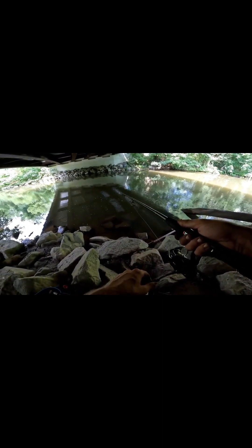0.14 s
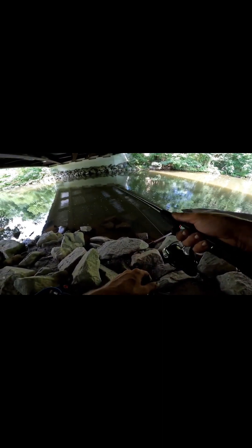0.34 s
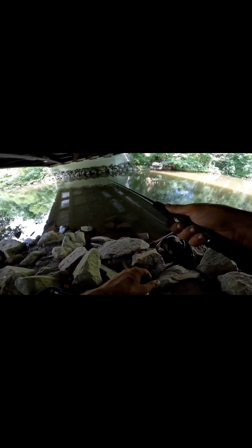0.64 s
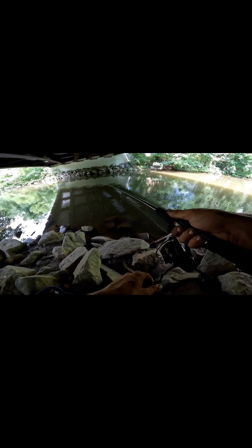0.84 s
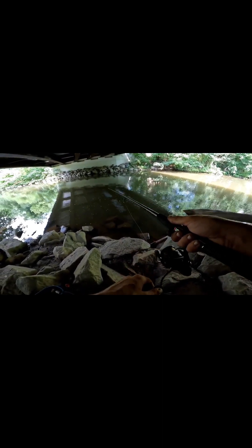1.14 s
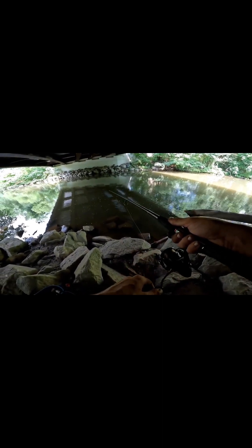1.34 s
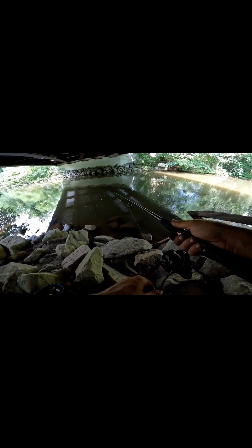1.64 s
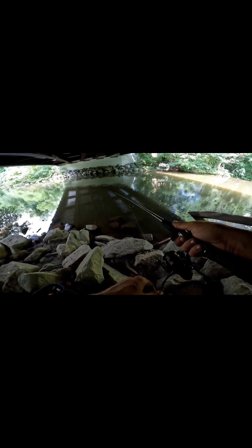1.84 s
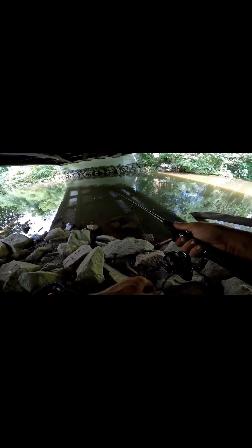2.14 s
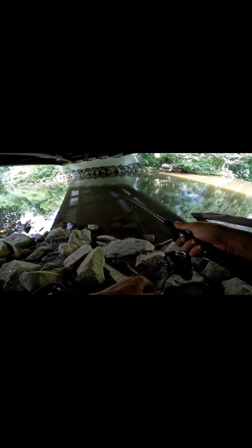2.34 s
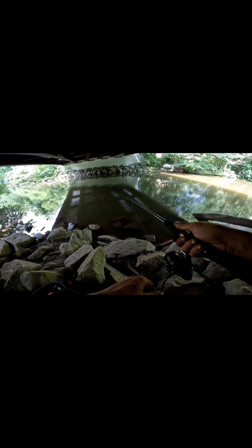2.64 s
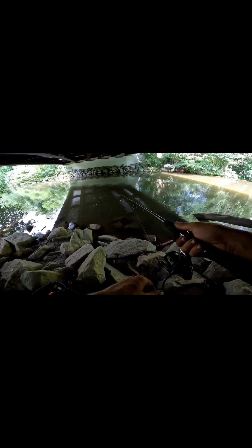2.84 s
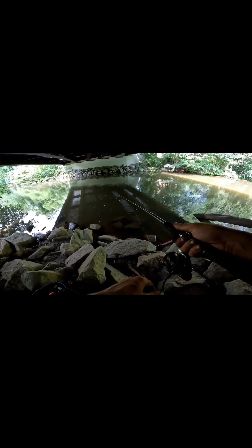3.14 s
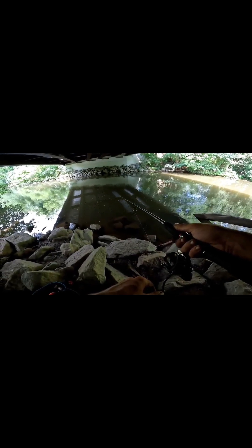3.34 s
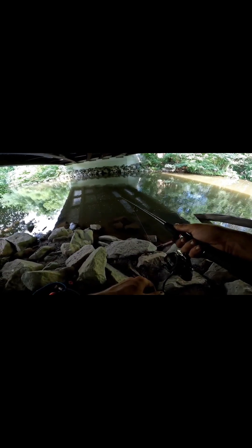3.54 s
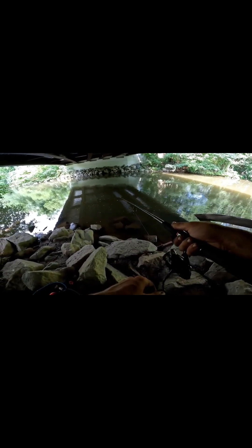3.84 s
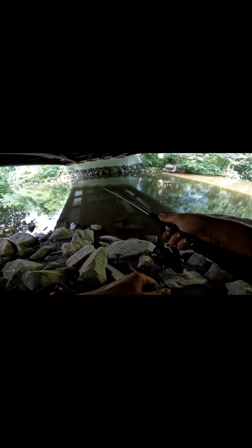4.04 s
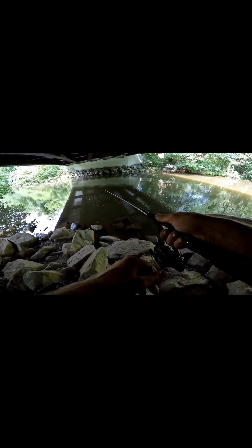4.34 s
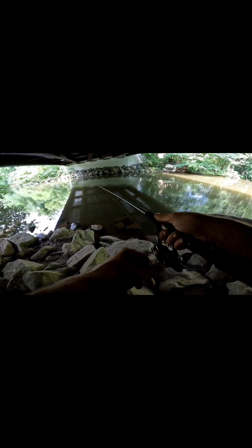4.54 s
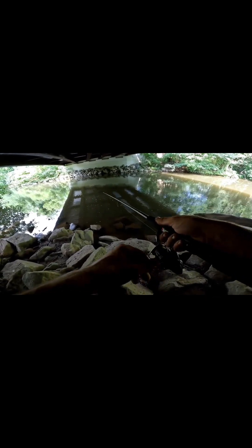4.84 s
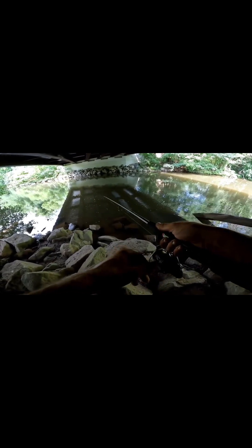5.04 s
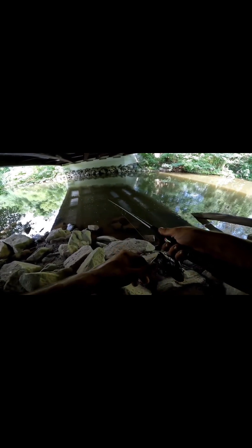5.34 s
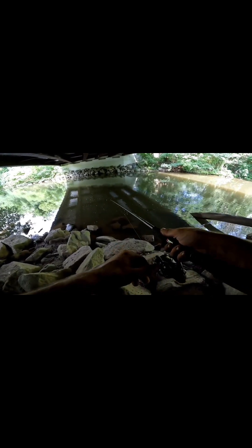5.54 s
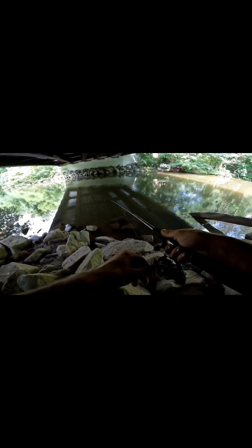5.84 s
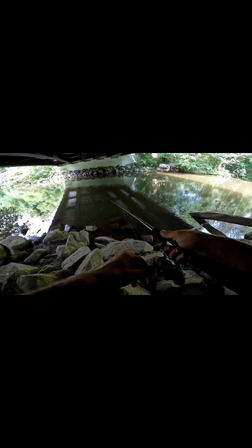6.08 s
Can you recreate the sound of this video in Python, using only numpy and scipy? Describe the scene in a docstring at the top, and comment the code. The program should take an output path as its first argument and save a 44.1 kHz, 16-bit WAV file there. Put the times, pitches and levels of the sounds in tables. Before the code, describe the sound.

Under a road bridge beside a creek, heard in stereo from the rocks. Throughout, a soft, bass-heavy outdoor wash, small hollow water gurgles, and fast, thin cricket trills around 7 kHz over a blurred distant chorus; a far insect rasps faintly about twice a second. A barely audible line rustle and tick open the scene. At 1.1-1.3 s muffled low thumps mark a vehicle rolling onto the deck; a deep rumble builds, with a tiny watery plip at 1.5 s. A hoarse rising bird chip echoes at 2.2 s. Tyre roar is brightest near 3.5 s, then falls off after 4.1 s. Tiny crisp gear ticks and a faint creak cluster at 3.9-4.0 s. A second chip follows at 4.3 s, a dull thump at 4.4 s. Deep shudder sinks away through 5-6 s, leaving crickets, a gurgle near 5.9 s, and a faint distant hoarse call around 6.1 s.

```python
"""A few near crickets trill, each a tone pulsed by its wing strokes, over grainy and blurred bands of farther ones.
Under a road bridge, a creek gurgles as many ringing bubbles, with a small splash and a steady noise wash.
A vehicle crosses overhead: low noise rumbles, joint thumps ring, and tyre noise swells and fades with distance.
A far insect rasps in noise swells, fishing gear ticks, creaks and rustles faintly, a bird gives two rising
chips with echoes and a scattered tail, and a last hoarse call swells as coloured noise."""
import sys
import numpy as np
from scipy import signal
from scipy.fft import rfft, irfft, next_fast_len
from scipy.io import wavfile
from scipy.ndimage import uniform_filter1d

SR = 44100
rng = np.random.default_rng(int(sys.argv[2]) if len(sys.argv) > 2 else 0)


def transcribe(signal):
    """Save signal, clipped to [-1, 1], as a 16-bit WAV file at the path in sys.argv[1]."""
    frames = np.atleast_2d(signal).T
    limited = np.clip(frames, -1, 1)
    pcm = np.round(limited * 32767).astype(np.int16)
    wavfile.write(sys.argv[1], SR, pcm)


N = 273851


def gain_of(db):
    """Level law: amplitude grows tenfold for every 20 dB."""
    return 10 ** (np.asarray(db) / 20)


def evened(x):
    """Normalisation: scales a signal to rms 1."""
    return x / np.sqrt(np.mean(x ** 2) + 1e-20)


def interpolated(points, hz):
    """Spectral interpolation: reads a curve on a log-frequency axis."""
    f, value = np.transpose(points)
    return np.interp(np.log(hz + 1), np.log(f + 1), value)


def level(rows):
    """Envelope: turns a dB curve over time into a gain for every sample."""
    return gain_of(np.interp(np.arange(N) / SR, *np.transpose(rows)))


def add(mix, start_s, sound):
    """Superposition: adds a sound to the mix at its start time."""
    part = mix[max(round(start_s * SR), 0):][:len(sound)]
    part += sound[:len(part)]


def drift(hz):
    """Random modulation: low-passed noise of rms 1, fading out above the given rate."""
    size = next_fast_len(N // 16)
    f = np.fft.rfftfreq(size, N / size / SR)
    slow = irfft(rfft(rng.standard_normal(size)) * np.exp(-(f / hz) ** 2), size)
    return evened(np.interp(np.linspace(0, size - 1, N), np.arange(size), slow))


def pan(x, side_db):
    """Intensity stereo: places a sound by its left-minus-right level."""
    return x * gain_of([[side_db / 2], [-side_db / 2]])


def steadied(x, span_s=0.48):
    """Gain control: divides noise by its smoothed strength, leaving its quick flutter."""
    power = uniform_filter1d(x.mean(0) ** 2, round(span_s * SR))
    return x / np.sqrt(uniform_filter1d(power, round(span_s * SR / 2)))


def swells(rows, length_s):
    """Amplitude envelope: a raised-cosine rise and fall centred on each row's time."""
    t = np.arange(N) / SR
    gain = 0
    for centre_s, db in rows:
        place = np.clip(2 * (t - centre_s) / length_s, -1, 1)
        gain = gain + gain_of(db) * np.cos(np.pi / 2 * place) ** 2
    return gain


def rings(rows, ring_s):
    """Damped resonance: each row (start s, level dB, Hz) gives one exponentially dying tone."""
    t, out = np.arange(SR // 2) / SR, np.zeros(N)
    for start_s, db, hz in rows:
        add(out, start_s, gain_of(db) * np.exp(-t / ring_s) * np.sin(2 * np.pi * hz * t))
    return out


# Likeness of the two microphones. Each row: frequency in Hz, left-right correlation.
COHERENCE = [(15, .995), (50, .9994), (150, .9996), (250, .994), (500, .94), (1030, .85), (2090, .66),
             (4250, .6), (7200, .78), (8700, .72), (12000, .4)]
# Spectral balance of the pair. Each row: frequency in Hz, left-minus-right level in dB.
BALANCE = [(300, 0), (550, 2.5), (950, 4), (1650, 3), (2860, 1), (5500, -1.5), (6500, 4), (7200, 3.5),
           (8000, 3), (8800, -1.5), (12000, 8.5)]
# Phase between the pair. Each row: frequency in Hz, lead of the left in radians.
PHASE_LEAD = [(500, -0.026), (1000, -0.48), (2580, -0.96), (3880, -0.11), (4910, -0.18), (7600, 0.48)]
# Resonances of the hollow under the deck. Each row: frequency in Hz, width in Hz, lift in dB.
HOLLOW = [(50.3, 9.6, -0.5), (106.2, 7.4, 2), (163.2, 8.5, 3), (224.2, 6.4, 3.5), (276, 13, 0.5),
          (309.4, 16, 2), (334.5, 16, 3.5), (443, 75, 2), (683, 11, 3), (918, 75, 3.5)]


def air(colour):
    """Diffuse field: partly coherent stereo noise of a given colour, lifted by the hollow's resonances."""
    size = next_fast_len(N)
    hz = np.fft.rfftfreq(size, 1 / SR)
    a, b, c, d = rng.standard_normal((4, len(hz)))
    apart = np.interp(hz, [150, 300], [0, 1])  # long waves reach both microphones at equal level and phase

    same = np.clip(interpolated(COHERENCE, hz), -1, 1)
    left = a + 1j * b
    right = same * left + np.sqrt(1 - same ** 2) * (c + 1j * d)
    right = right * np.exp(-1j * apart * interpolated(PHASE_LEAD, hz))
    tilt = gain_of(apart * interpolated(BALANCE, hz) / 2)

    boom_db = sum(db / (1 + (2 * (hz - f) / width) ** 2) for f, width, db in HOLLOW)
    closed = 1 / (1 + (hz / colour[-1][0]) ** 10)  # fades out above the last point
    gain = gain_of(interpolated(colour, hz) + boom_db) * closed
    pair = irfft(np.array([left * tilt, right / tilt]) * gain, size)[:, :N]
    return pair / pair.mean(0).std()


# Reverberation under the bridge. Each row: frequency in Hz, time to fall 60 dB in seconds.
DECAY = [(2000, 0.77), (5000, 0.97), (9000, 1)]


def bridge(x, same=0.46):
    """Reverberation: concrete and water scatter sound into a noise tail decaying at its own rate per band."""
    a, b = rng.standard_normal((2, SR))
    same = np.clip(same, 0, 1)
    right = same * a + np.sqrt(1 - same ** 2) * b
    hz, t, z = signal.stft([a, right], SR, nperseg=256)
    decay = np.exp(-np.log(1000) * t / interpolated(DECAY, hz)[:, None])
    tail = signal.istft(z * decay, SR)[1]
    return signal.fftconvolve(x[None], tail / np.linalg.norm(tail[0]), axes=1)[:, :N]


# Steady wash of creek and far roads. Each row: frequency in Hz, relative level in dB per Hz.
WASH_COLOUR = [(15, -1.5), (50, 2.5), (80, 0), (110, -4.5), (200, -12), (330, -19.5), (600, -20.5),
               (780, -21.5), (930, -21), (1100, -21.5), (1500, -24), (2400, -36), (4200, -49), (8500, -52),
               (13000, -94)]


def wash(level_db=-34.5):
    """Stationary noise: the outdoor wash is coloured noise held at an even strength."""
    return steadied(air(WASH_COLOUR)) * gain_of(level_db)


def bubbles(range_hz, count, per_s, ring_s, spread_db, rise_per_s=1.4, wet_db=-2):
    """Bubble resonance: bubbles of many pitches ring and glide upward at random (Poisson) moments."""
    t, out = np.arange(SR // 10) / SR, np.zeros(N)
    for hz in np.geomspace(*range_hz, count):
        envelope = (1 - np.exp(-10 * t / ring_s)) * np.exp(-t / ring_s)
        bubble = envelope * np.sin(2 * np.pi * hz * t * (1 + rise_per_s * t / 2))
        starts_s = np.cumsum(rng.exponential(count / per_s, 100))
        for start_s, size in zip(starts_s, rng.exponential(1, 100)):
            add(out, start_s, gain_of(spread_db * min(size, 3)) * bubble)
    return evened(out + gain_of(wet_db) * bridge(out))


# Louder gurgles of the creek. Each row: centre in seconds, level in dB.
GURGLES = [(.38, -47), (.93, -50), (1.41, -46.5), (2.34, -49), (3.25, -45), (5.87, -46.5), (6.13, -50)]
# Pitches of the bubbles at their start: lowest and highest in Hz, for the babble and the finer trickle.
BABBLE_HZ = (893, 1089)
TRICKLE_HZ = (620.4, 1394)


def gurgle(length_s=0.14, babble_db=-56.5, trickle_db=-54.5, side_db=3.5):
    """Bubble acoustics: one hollow babbles with louder clumps, and water trickles among the stones."""
    babble = bubbles(BABBLE_HZ, count=16, per_s=170, ring_s=0.011, spread_db=3.0)
    trickle = bubbles(TRICKLE_HZ, count=30, per_s=110, ring_s=0.0095, spread_db=2.5, wet_db=-8.5)
    babble = babble * np.hypot(gain_of(babble_db), swells(GURGLES, length_s))
    return pan(babble + gain_of(trickle_db) * trickle, side_db)


def strokes(hz, first_s, rate, uneven_db=0.5, scrape=0.18, scrape_hz=420, stroke_s=.031, sag_hz=140):
    """Stridulation: each wing closing rings a tone that sags as the scraper slows; uneven teeth roughen it."""
    t = np.arange(N) / SR + .0015 * drift(2)  # the beat wanders by 1.5 ms rms
    # travel of the scraper along the file, 0 to 1; the wings open again in silence
    cycle = (rate * (t - first_s) + .5) % 1 - .5
    place = np.clip(cycle / (rate * stroke_s) + .5, 0, 1)
    pitch = hz + sag_hz * (1 / 10 - place ** 4) + 14 * drift(30)
    teeth = 1 + scrape * (drift(scrape_hz) + 1j * drift(scrape_hz))
    tone = (teeth * np.exp(2j * np.pi * np.cumsum(pitch) / SR)).real
    return evened(np.sin(np.pi * place) * tone * gain_of(uneven_db * drift(5.8)))


# Near crickets. Each row: direct level in dB, left-minus-right level in dB.
CRICKETS = [(-64.5, 4.5), (-65.5, 6), (-68.5, 2), (-68.5, 2.5), (-76, 4)]
# Their wings. Each row: nominal pitch in Hz, middle of the first stroke in seconds, strokes per second.
WINGS = [(7200, .019, 13.58), (7440, .035, 14.91), (6985, .007, 13.52), (6900, .036, 14.22),
         (7650, .041, 15.2)]


def near_crickets(wet_db=-5):
    """Unequal periods: close crickets, each at its own pitch and wing rate, drift in and out of step."""
    out = np.zeros((2, N))
    for (db, side_db), wings in zip(CRICKETS, WINGS):
        song = strokes(*wings)
        out += gain_of(db) * pan(song + gain_of(wet_db) * bridge(song), side_db)
    return out


# Crickets further along the bank: lowest and highest nominal pitch in Hz.
BANK_HZ = (6650, 7800)


def bank_crickets(count=9, level_db=-60.5, wet_db=-5, side_db=4, edge_db=-6):
    """Superposed trills: many crickets make a grainy shimmer, faintest at its highest and lowest pitches."""
    song = np.zeros(N)
    wings = rng.uniform([0, 12.5], [1, 16], (count, 2))  # first stroke in s, strokes per s
    for u, (first_s, rate) in zip(np.linspace(0, 1, count), wings):
        hz = np.interp(u, [0, 1], BANK_HZ)
        edge = gain_of(edge_db * (2 * u - 1) ** 2)
        song += edge * strokes(hz, first_s, rate, uneven_db=4.0, scrape=0.37)
    return gain_of(level_db) * pan(evened(song + gain_of(wet_db) * bridge(song)), side_db)


# Colour of the far chorus. Each row: frequency in Hz, relative level in dB per Hz.
CHORUS_COLOUR = [(5900, -21.5), (6250, -15.5), (6520, -1), (6760, -5), (6920, 3), (7080, 4.5), (7330, 5),
                 (7600, -4), (7870, -2.5), (8150, -13.5), (8400, -35.5), (9600, -23), (10500, -37.5)]
# Its course, before the chorus's share is taken. Each row: time in seconds, level in dB.
CHORUS_COURSE = [(0.2, -51), (0.25, -51.5), (2.19, -53), (5.64, -53), (6.1, -51)]


def chorus(count=6, throb=0.18, share_db=-2.5):
    """Amplitude modulation: far crickets blur into a noise band; each group throbs at its own wing rate."""
    t, out = np.arange(N) / SR, np.zeros((2, N))
    for rate, start in rng.uniform([12.5, 0], [16.5, 1], (count, 2)):  # throbs per s, phase in cycles
        out += air(CHORUS_COLOUR) * (1 + throb * np.cos(2 * np.pi * (rate * t + start)))
    return evened(out) * level(CHORUS_COURSE) * gain_of(share_db)


# Louder rasps of a far insect. Each row: centre in seconds, level in dB.
RASPS = [(.47, -67), (1.42, -65), (2.33, -65), (2.87, -67), (3.63, -71), (4.48, -69), (4.98, -66),
         (5.98, -67)]
# Their colour. Each row: frequency in Hz, relative level in dB per Hz.
RASP_COLOUR = [(4300, -24), (5100, -9.5), (5700, 5), (6100, 7), (6500, 12), (7000, -2), (7800, -31)]


def far_insect(length_s=0.44, first_s=.43, beat_s=0.46, beat_db=-70, grain_db=1.5, grain_hz=120):
    """Modulated noise: soft, grainy rasps swell and fade on a slow beat, and some stand out."""
    t = np.arange(N) / SR
    beat = gain_of(beat_db) * np.cos(np.pi * (t - first_s) / beat_s) ** 2
    grain = evened(gain_of(grain_db * drift(grain_hz)))
    return air(RASP_COLOUR) * np.hypot(beat, swells(RASPS, length_s)) * grain


# Short runs of tiny clicks in the reel. Each row: centre in seconds, level in dB.
CREAKS = [(3.89, -82)]


def creak(per_s=350, spread_db=4, length_s=0.3, low_hz=9000):
    """Stick-slip: tiny random slips of the reel crowd into a thin, rough crackle."""
    sizes = gain_of(spread_db * np.minimum(rng.exponential(1, N), 3))
    slips = sizes * (rng.random(N) < per_s / SR)
    thin = signal.sosfilt(signal.butter(2, low_hz, "high", fs=SR, output="sos"), slips)
    return evened(thin) * swells(CREAKS, length_s)


# Ticks of the fishing gear. Each row: start in seconds, level in dB, frequency in Hz.
TICKS = [(.175, -67, 10000), (3.859, -60, 12600), (3.917, -58, 8940), (3.918, -64, 13000),
         (3.941, -65, 10500), (3.942, -48, 5300), (3.95, -67, 10000), (4.008, -49, 5600)]
# Rustles of the fishing line. Each row: centre in seconds, level in dB.
RUSTLES = [(.3, -79), (3.9, -85)]
# Their colour. Each row: frequency in Hz, relative level in dB per Hz.
RUSTLE_COLOUR = [(3000, -8), (9000, 2), (11000, -10), (12200, -1), (14000, -9)]


def gear(wet_db=-6, rustle_s=0.56, snap_db=-2, ragged_db=2.5, ragged_hz=70):
    """Impact and friction: tiny hard parts snap and ring for under a millisecond; the line rustles as noise."""
    snaps = gain_of(snap_db) * rings(TICKS, ring_s=.00012)
    ticks = rings(TICKS, ring_s=.0006) + snaps + creak()
    rustle = air(RUSTLE_COLOUR) * swells(RUSTLES, rustle_s) * gain_of(ragged_db * drift(ragged_hz))
    return pan(ticks, 2) + gain_of(wet_db) * bridge(ticks) + rustle


# Wheels thump over the joints of the deck. Each row: start in seconds, level before the low-pass in dB,
# frequency in Hz.
THUMPS = [(1.11, -25, 37.2), (1.268, -21.5, 107), (4.385, -21.5, 58.4)]


def thumps():
    """Low-pass transmission: thick concrete lets only the bass of each ringing thump through."""
    return signal.sosfilt(signal.butter(2, 200, fs=SR, output="sos"), rings(THUMPS, ring_s=0.0374))


# When the vehicle rolls onto the deck, is overhead and rolls off, in seconds.
ON_DECK_S, OVERHEAD_S, OFF_DECK_S = 1.115, 3.45, 4.086


def rolling(attack_s, release_s):
    """Exponential build-up and decay: a gain that grows once the vehicle is on the deck and dies after it."""
    t = np.arange(N) / SR
    build = 1 - np.exp(-np.maximum(t - ON_DECK_S, 0) / attack_s)
    return build * np.exp(-np.maximum(t - OFF_DECK_S, 0) / release_s)


def heave(start_s, peak_s):
    """Transient loading: a gain that climbs to 1 in the peak time and sinks back more slowly."""
    u = np.maximum(np.arange(N) / SR - start_s, 0) / peak_s
    return (u * np.exp(1 - u)) ** 3


# Colours of the deep shudder and the drumming. Each row: frequency in Hz, relative level in dB per Hz.
SHUDDER_COLOUR = [(5, -16.5), (12, 1), (22, -2), (33, -15.5), (44, 0), (53, -3.5), (64, -8.5), (90, -21.5),
                  (200, -53)]
DRUM_COLOUR = [(45, -29), (75, -7), (92, -1.5), (115, 0.1), (160, -5), (225, -8.5), (280, -12.5),
               (420, -30), (900, -46.5)]
# The deck heaves as the load crosses its ends, and settles after it. Each row: start in seconds, time to
# the shudder's peak in seconds, shudder level in dB, drumming level in dB, top of the drumming in Hz.
HEAVES = [(1.14, 0.47, -31, -28.5, 140), (3.62, 0.6, -27.5, -33, 405), (4.45, 0.36, -30, -40, 380),
          (5.05, 0.39, -34, -41.5, 140)]


def deck(shudder_db=-34, drum_db=-33.5, drum_time_share=0.7):
    """Structure-borne sound: rolling and heaves shake the deck; drumming answers before the deep shudder."""
    shudder = gain_of(shudder_db) * rolling(attack_s=0.2, release_s=2.1)
    drum = steadied(air(DRUM_COLOUR)) * gain_of(drum_db) * rolling(attack_s=0.31, release_s=1.1)
    for start_s, peak_s, heave_db, boom_db, top_hz in HEAVES:
        shudder = np.hypot(shudder, gain_of(heave_db) * heave(start_s, peak_s))
        low_pass = signal.butter(2, top_hz, fs=SR, output="sos")
        boom = signal.sosfilt(low_pass, steadied(air(DRUM_COLOUR)))
        drum = drum + boom * gain_of(boom_db) * heave(start_s, peak_s * drum_time_share)
    return steadied(air(SHUDDER_COLOUR)) * shudder + drum


# Tyre roar, bright from overhead and duller from along the road.
# Each row: frequency in Hz, relative level in dB per Hz.
BRIGHT_COLOUR = [(130, -12), (240, 1.5), (340, -2), (400, -6), (490, -2), (640, -6), (760, -11),
                 (950, -8.5), (1400, -15), (2200, -29), (3200, -31), (4200, -35), (6000, -37),
                 (11000, -59.5), (12100, -49.5), (13600, -72)]
DULL_COLOUR = [(200, -26), (330, 2), (390, -10.5), (470, -2), (640, -8), (900, -13.5), (1600, -33.5)]


def tyres(bright_db=-38.5, dull_db=-40.5, speed_m_per_s=13.1, distance_m=9.3, uneven_db=0.4, uneven_hz=25):
    """Inverse-distance law: the bright roar peaks overhead; a dull roar gains as the tyres lie further along."""
    along_m = speed_m_per_s * (np.arange(N) / SR - OVERHEAD_S)
    range_m = np.hypot(along_m, distance_m)
    bright = gain_of(bright_db) * distance_m / range_m * rolling(attack_s=0.064, release_s=0.25)
    dull = gain_of(dull_db) * abs(along_m) / range_m * rolling(attack_s=0.4, release_s=0.41)
    roar = air(BRIGHT_COLOUR) * bright + air(DULL_COLOUR) * dull
    return roar * gain_of(uneven_db * drift(uneven_hz))


def vehicle():
    """Superposed paths: thumps and deck vibration join the airborne tyre roar of one crossing."""
    return deck() + tyres() + thumps()


# A small splash, a few bubbles at once. Each row: start in seconds, level in dB, frequency in Hz.
PLIPS = [(1.532, -58, 2600), (1.539, -55, 2750), (1.548, -52, 2620), (1.553, -57, 2280)]


def plip(wet_db=-5):
    """Damped bubble resonance: a few bubbles ring briefly on the creek."""
    bubble = rings(PLIPS, ring_s=0.0051)
    return bubble + gain_of(wet_db) * bridge(bubble)


# Bird chips. Each row: start in seconds, level in dB before the chip's shaping, level in dB of the
# scattered tail before its build-up and fade.
CHIPS = [(2.189, -59, -62.5), (4.29, -61, -60.5)]
# Colour of that tail. Each row: frequency in Hz, relative level in dB per Hz.
CHIP_TAIL_COLOUR = [(3000, -13), (3900, -3.5), (4900, -3), (5900, -3.5), (6500, 1), (7500, -16)]


def bird(length_s=0.046, low_hz=3300, high_hz=6500, rasp=0.7,
         walls_s=(.08, .125, .185), walls_db=-8, bounce_db=-1.5,
         build_s=.045, fade_s=0.24, patchy_db=1.5, patchy_hz=60):
    """Frequency glide and echo: a hoarse upward chip returns from the piers; the banks scatter a grainy tail."""
    u, t = np.linspace(0, 1, round(length_s * SR)), np.arange(N) / SR
    pitch = low_hz + (high_hz - low_hz) * u * (3 - u) / 2
    carrier = np.exp(2j * np.pi * np.cumsum(pitch) / SR)
    envelope = np.sin(np.pi * u) * (1 - u / 2)
    song, tail = np.zeros((2, N))
    for start_s, db, tail_db in CHIPS:
        hoarse = 1 + rasp * (drift(500) + 1j * drift(500))[:len(u)]
        add(song, start_s, gain_of(db) * envelope * (hoarse * carrier).real)
        age = np.maximum(t - start_s, 0)
        tail += gain_of(tail_db) * (1 - np.exp(-age / build_s)) * np.exp(-(age / fade_s) ** 2 / 2)
    echoes = 0
    for k, delay_s in enumerate(walls_s):
        echoes = echoes + gain_of(walls_db + bounce_db * k) * np.roll(song, round(delay_s * SR))
    return song + echoes + air(CHIP_TAIL_COLOUR) * tail * gain_of(patchy_db * drift(patchy_hz))


# A faint hoarse call, perhaps a far bird. Each row: centre in seconds, level in dB.
FAR_CALL = [(6.12, -57)]
# Its colour. Each row: frequency in Hz, relative level in dB per Hz.
FAR_CALL_COLOUR = [(1200, -25), (1500, -7), (1640, 4), (1800, -6), (2050, -7), (2400, -16)]


def far_call(length_s=0.43):
    """Narrow-band noise: a hoarse call, smeared by distance, swells far off."""
    return air(FAR_CALL_COLOUR) * swells(FAR_CALL, length_s)


def scene():
    """Linear superposition: everything heard from the rocks under the bridge adds up."""
    water = wash() + gurgle() + plip()
    insects = near_crickets() + bank_crickets() + chorus() + far_insect()
    return water + insects + gear() + vehicle() + bird() + far_call()


def record(dry, edge_hz=13600):
    """Band limiting: the recorder's linear-phase low-pass removes the highest treble."""
    low_pass = signal.firwin(511, edge_hz, window=("kaiser", 9), fs=SR)
    return signal.oaconvolve(dry, low_pass[None], "same")


dry = scene()
out = record(dry)
transcribe(out)
```